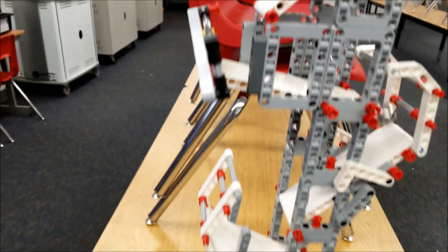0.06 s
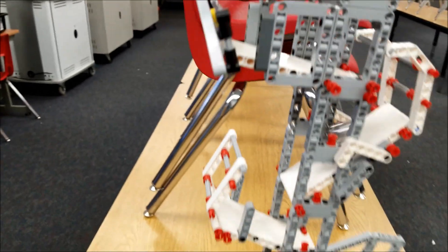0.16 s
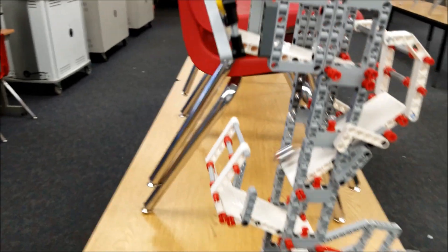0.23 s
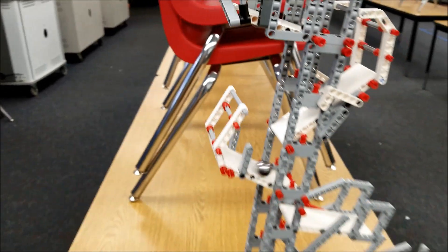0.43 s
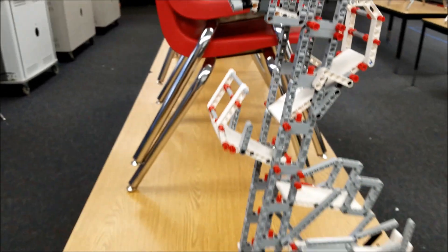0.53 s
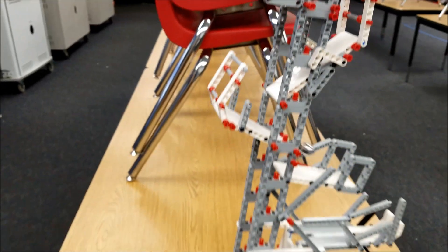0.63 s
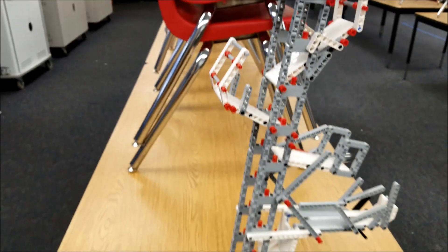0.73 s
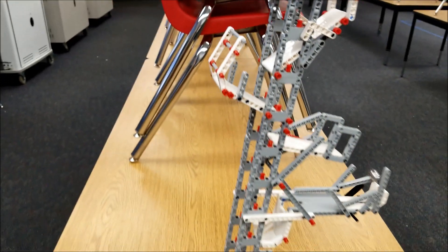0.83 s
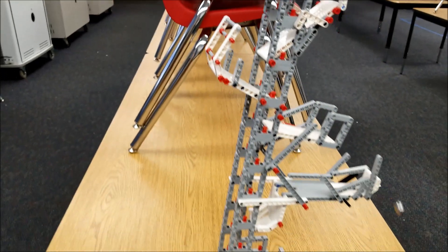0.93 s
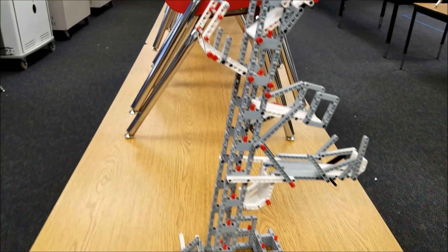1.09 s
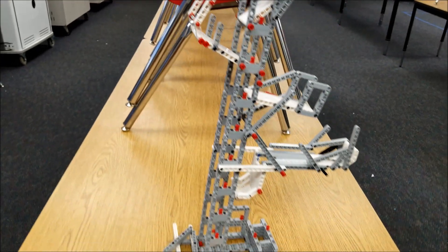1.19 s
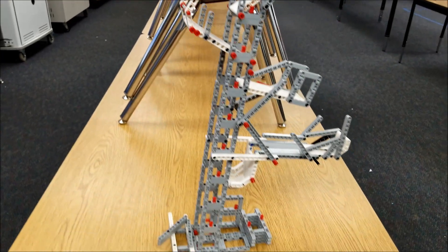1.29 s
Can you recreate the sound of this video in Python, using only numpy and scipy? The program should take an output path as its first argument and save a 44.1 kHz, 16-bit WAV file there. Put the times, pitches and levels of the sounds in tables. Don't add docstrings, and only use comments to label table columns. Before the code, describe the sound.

Steel ball dropping from slide to slide on a plastic toy tower, hard bright clacks, quiet classroom.

```python
import sys
import numpy as np
from scipy import signal
from scipy.fft import rfft, irfft
from scipy.io import wavfile
from scipy.ndimage import uniform_filter1d

SR = 44100
rng = np.random.default_rng(int(sys.argv[2]) if len(sys.argv) > 2 else 0)


def voltage_ratio(level):
    return 10 ** (np.asarray(level, float) / 20)


def file_out(sig):
    cols = np.atleast_2d(sig).T
    lim = np.clip(cols, -1, 1)
    pcm = np.round(lim * 32767).astype(np.int16)
    wavfile.write(sys.argv[1], SR, pcm)


N = 59535

# f/Hz, share/0-1
ROOM_SHARE = [(150, 0.91), (400, 0.53), (1400, 0.45), (4000, 0.01)]


def read(table, hz):
    table = np.array(table, float)
    return np.interp(np.log(np.maximum(hz, 1)), np.log(table[:, 0]), table[:, 1])


def curve(table):
    table = np.array(table, float)
    return voltage_ratio(np.interp(np.arange(N) / SR, table[:, 0], table[:, 1]))


def causal(db):
    cepstrum = irfft(db * np.log(10) / 20)
    half = len(cepstrum) // 2
    fold = np.r_[1, np.full(half - 1, 2), 1, np.zeros(half - 1)]
    return np.exp(rfft(cepstrum * fold))


def pair(white, likeness):
    both, apart = rfft(white)
    share = np.clip(read(likeness, np.linspace(0, SR / 2, len(both))), 0, 1)
    opposed = apart * np.array([[1], [-1]])
    return (np.sqrt(1 + share) * both + np.sqrt(1 - share) * opposed) / np.sqrt(2)


def noise(db, grain_db=0.):
    white = rng.standard_normal((2, N)) * voltage_ratio(grain_db * rng.exponential(size=N))
    out = irfft(pair(white, ROOM_SHARE) * voltage_ratio(db), N)
    return out / out.std()


def strike(hits, colour, rings, right_late_us, chatter_db, room_db):
    # f/Hz, share
    alike = [(400, 4), (1500, 1.5), (6000, -0.5)]
    size = 4096
    hz, t = np.linspace(0, SR / 2, size // 2 + 1), np.arange(size) / SR
    ring = sum(lift / (1 + (2 * (hz - f) / width) ** 2) for f, width, lift in rings)
    late = np.array([[0], [right_late_us / 10 ** 6]])
    near, feed = np.zeros((2, N + size)), np.zeros(N + size)
    for at, db, tilt, ms, pan in hits:
        i = int(at * SR) - 16
        start = np.exp(-2j * np.pi * hz * (at - i / SR + late))
        tick = -min(1, 0.71 / ms)
        grit = rng.standard_normal((2, size)) * np.exp(-t / (ms / 1000))
        chatter = voltage_ratio(chatter_db) * pair(grit, alike) * hz / np.hypot(hz, 1590)
        push = (tick + chatter) * start
        body = read(colour, hz) + tilt * np.log2(np.maximum(hz, 800) / 3000)
        hit = irfft(push * causal(body + ring))
        shade_db = np.clip(pan, -5, 5) * np.array([[1], [-1]]) * hz / (hz + 2420)
        hit = irfft(rfft(hit) * voltage_ratio(shade_db))
        gain = voltage_ratio(db) / np.abs(hit.mean(axis=0)).max()
        near[:, i:i + size] += hit * gain
        feed[i:i + size] += irfft(push[0] * causal(body + 0.29 * ring)) * gain * voltage_ratio(room_db)
    return near[:, :N], feed[:N]


def ventilation():
    # f/Hz, level/dB
    air = [(25, -28), (42, -29), (62, -9), (98, -23.5), (125, -15.5), (165, -21), (280, -32), (520, -47.5),
           (6000, -59), (13000, -48)]
    return noise(read(air, np.linspace(0, SR / 2, N // 2 + 1))) * voltage_ratio(-65)


def mains_hum():
    wobble = uniform_filter1d(rng.standard_normal(N), size=2000)
    level_db = -66.5 + 0.5 * wobble / wobble.std()
    return np.sqrt(2) * np.sin(2 * np.pi * 119.6 * np.arange(N) / SR) * voltage_ratio(level_db)


def trembling_tower():
    # t/s, level/dB
    shaking = [(0, -50), (.06, -71.5), (.15, -55), (.2, -70.5), (.25, -60), (.29, -68), (.33, -55.5),
               (.52, -61.5), (.58, -91), (.68, -86), (.75, -64), (.95, -74)]
    centre_hz, width_hz = 82, 80
    hz = np.linspace(0, SR / 2, N // 2 + 1)
    return noise(-20 * np.log10(1 + (2 * (hz - centre_hz) / width_hz) ** 2)) * curve(shaking)


def rolling_ball():
    # t/s, level/dB
    rolling = [(0, -53), (.03, -60.5), (.09, -72.5), (.3, -64), (.4, -58), (.52, -70), (.6, -67.5),
               (.66, -77), (.8, -75.5), (.9, -56.5), (1.02, -105)]
    # f/Hz, level/dB
    colour = [(150, -34.5), (250, -7.5), (1640, -13.5), (1980, -12), (3520, -18), (4340, -18.5),
              (7570, -22), (16000, -24.5)]
    return noise(read(colour, np.linspace(0, SR / 2, N // 2 + 1)), grain_db=1.5) * curve(rolling)


def table_top():
    # t/s, peak/dB, tilt/(dB per octave), chatter/ms, left-right/dB
    hits = [
        (.0458, -51, 2, .3, 0),
        (1.2563, -34, 0.28, 0.34, 0),
        (1.263, -53.5, 3.5, .3, 0),
        (1.3265, -50, 0, 0.22, 1),
    ]
    # f/Hz, level/dB
    colour = [(120, -21), (200, -8), (623, -3), (1040, -9), (1710, -17), (2860, -22.5), (6760, -46),
              (10100, -40), (16000, -37)]
    # f/Hz, width/Hz, lift/dB
    rings = [(333, 60, 5.5), (1030, 140, 7.6), (1440, 270, 3.4)]
    return strike(hits, colour, rings, right_late_us=170, chatter_db=-19, room_db=-0.38)


def top_slide():
    # t/s, peak/dB, tilt/(dB per octave), chatter/ms, left-right/dB
    hits = [
        (.1015, -16, -0.5, 0.37, 1),
        (.1023, -22, 4, 1.8, 0),
        (.1063, -27, 2, 2, -3),
        (.1095, -30.5, -1, 0.69, 2.5),
        (.1104, -29.5, 3.5, 2, -2),
        (.116, -35, -4.5, 1.6, 5.5),
    ]
    # f/Hz, level/dB
    colour = [(60, -35.5), (140, -1), (330, -16), (1100, -9), (2800, -13.5), (9500, -18), (13500, -17.5),
              (16500, -21.5)]
    # f/Hz, width/Hz, lift/dB
    rings = [(500, 87, 11), (657, 190, 12.5), (1900, 400, 4), (5800, 710, 11), (7770, 620, 6),
             (12800, 900, 13), (14100, 500, 4.5)]
    return strike(hits, colour, rings, right_late_us=41, chatter_db=-6.5, room_db=-6.5)


def gate():
    # t/s, peak/dB, tilt/(dB per octave), chatter/ms, left-right/dB
    hits = [
        (.2456, -34.5, -0.24, 1, 0),
        (.2463, -35, 0.21, 1.5, 0.016),
        (.2487, -34.5, -2.3, 1.5, 0.13),
        (.2517, -33, 1.7, 1, 0.97),
        (.2535, -41.5, 0, 2, 0),
    ]
    # f/Hz, level/dB
    colour = [(120, -31), (330, -1.5), (1200, -9.5), (4200, -13), (6500, -12.5), (9500, -17), (15500, -19)]
    # f/Hz, width/Hz, lift/dB
    rings = [(650, 250, 3.5), (1990, 250, 5.3), (3350, 300, 6.9), (5730, 900, 6), (11700, 900, 5),
             (13700, 840, 7.6)]
    return strike(hits, colour, rings, right_late_us=82, chatter_db=-4, room_db=-9)


def chute():
    # t/s, peak/dB, tilt/(dB per octave), chatter/ms, left-right/dB
    hits = [
        (.3088, -12, 1, 0.65, 1.5),
        (.3108, -24.5, 1.5, 1.5, 1.5),
        (.3128, -30.5, -3, 1.5, -1),
        (.315, -21.5, -1, 1.5, -3.5),
        (.3173, -26, -3, 1, -4),
        (.3232, -24, 4, 1.5, 7.5),
        (.3248, -25, 1, 2, 5),
        (.3275, -32.5, -0.5, 3, -0.5),
    ]
    # f/Hz, level/dB
    colour = [(90, -43.5), (200, -6), (1100, -10), (2200, -11), (4300, -17.5), (9000, -14.5),
              (16000, -13.5)]
    # f/Hz, width/Hz, lift/dB
    rings = [(688, 170, 7.6), (1483, 440, 10), (2920, 560, 15), (5840, 770, 14.5), (7800, 350, 13),
             (11120, 800, 13), (13310, 1500, 6)]
    return strike(hits, colour, rings, right_late_us=-40, chatter_db=-9, room_db=-9.5)


def rail():
    # t/s, peak/dB, tilt/(dB per octave), chatter/ms, left-right/dB
    hits = [
        (.3355, -40, -2, 1.6, -0.5),
        (.345, -34, 0.5, 6, -0.5),
        (.3603, -30, 2, 1.6, -0.5),
        (.376, -42, -4.5, 2, -8),
        (.3803, -36, -1, 6.1, 2),
        (.395, -38.5, 3, 3, -1.5),
        (.4003, -44, 0.5, 2.3, -6.5),
    ]
    # f/Hz, level/dB
    colour = [(90, -34.5), (250, -15.5), (1500, -5.5), (4200, -10.5), (9000, -14), (12000, -9),
              (16000, -19.5)]
    # f/Hz, width/Hz, lift/dB
    rings = [(1810, 500, 7.9), (2760, 540, 4.3), (6100, 890, 7), (7700, 890, 9.2)]
    return strike(hits, colour, rings, right_late_us=-21, chatter_db=-2, room_db=-5)


def flap():
    # t/s, peak/dB, tilt/(dB per octave), chatter/ms, left-right/dB
    hits = [
        (.4751, -28, 1, 1.72, 0),
        (.4802, -33, -0.5, 0.91, 1),
        (.4815, -27, 4, 0.3, 2),
        (.4827, -37, -5, 1.2, 1),
        (.495, -47.5, -4.5, 0.62, 0),
        (.527, -50, -2.5, 1.3, 0),
    ]
    # f/Hz, level/dB
    colour = [(120, -20), (230, -7.5), (600, -12.5), (1500, -11), (4000, -16.5), (6500, -13), (9500, -17),
              (15500, -19)]
    # f/Hz, width/Hz, lift/dB
    rings = [(880, 350, 3.1), (6380, 400, 6.4), (7940, 700, 11), (10350, 640, 6.2), (12500, 600, 14)]
    return strike(hits, colour, rings, right_late_us=55, chatter_db=-6, room_db=-7.5)


def ramp():
    # t/s, peak/dB, tilt/(dB per octave), chatter/ms, left-right/dB
    hits = [
        (.6765, -60.5, -5, 1, 4),
        (.6992, -18.5, 0, 1, -4.5),
        (.701, -25.5, -2, 1.3, 2),
        (.703, -28, -1.5, 1.8, 3.5),
        (.7055, -24.5, -1.5, 0.98, 4),
        (.708, -36, -4, 2.9, 2.5),
        (.7135, -28, 0.5, 0.75, 2),
        (.7165, -37, -6.5, 4.6, -3),
        (.7205, -39, -2, 1.7, -0.5),
        (.7503, -35.5, -1.5, 2.9, -5),
    ]
    # f/Hz, level/dB
    colour = [(59, -38.5), (100, -6), (492, -6), (752, -12.5), (1450, -7.5), (2370, -8.5), (3500, -16),
              (8280, -13), (16000, -15.5)]
    # f/Hz, width/Hz, lift/dB
    rings = [(191, 47, 21.2), (449, 93, 15.5), (1026, 150, 8), (1490, 130, 6), (1785, 250, 10.8),
             (2450, 300, 8), (5900, 660, 6), (12530, 5000, 11)]
    return strike(hits, colour, rings, right_late_us=19.7, chatter_db=-10.5, room_db=-3.5)


def lip():
    # t/s, peak/dB, tilt/(dB per octave), chatter/ms, left-right/dB
    hits = [
        (.8568, -25.5, -0.56, 1, 0.075),
        (.858, -24, -0.51, 1.6, 0.0052),
    ]
    # f/Hz, level/dB
    colour = [(200, -50), (900, -23), (1600, -18.5), (4200, -15.5), (7200, -14.5), (9400, -24.5),
              (13000, -5), (16000, -15.5)]
    # f/Hz, width/Hz, lift/dB
    rings = [(2500, 140, 5), (5800, 800, 5), (8200, 960, 18), (10600, 650, 6), (13300, 700, 8)]
    return strike(hits, colour, rings, right_late_us=64, chatter_db=-4, room_db=-4)


def tray():
    # t/s, peak/dB, tilt/(dB per octave), chatter/ms, left-right/dB
    hits = [
        (.8678, -16, 0.5, 0.84, 0),
        (.869, -16.5, 1, 1.2, -0.56),
        (.8712, -23, -2.5, 2.1, -0.816),
        (.875, -27, -4, 1.4, -1.2),
        (.883, -34.5, 1, 1.8, 0),
        (.8865, -34, 6, 1.7, 0),
        (.895, -30.5, -0.5, 2.2, 0),
        (.9015, -35, -4.5, 3, -1),
    ]
    # f/Hz, level/dB
    colour = [(200, -39), (900, -22.5), (2300, -15), (4200, -15), (7200, -11), (9400, -20), (11700, -8),
              (16000, -9.5)]
    # f/Hz, width/Hz, lift/dB
    rings = [(2400, 450, 7.8), (5400, 2200, 3.5), (7280, 1100, 14.1), (11300, 1500, 7.9), (13100, 480, 3),
             (14600, 900, 11)]
    return strike(hits, colour, rings, right_late_us=69, chatter_db=-6.5, room_db=-6.5)


def room(feed):
    # f/Hz, time/s
    decay = [(150, 1), (500, 0.61), (1400, 0.38), (3700, 0.36), (9000, 0.29), (15000, 0.2)]
    size, gap_s, rise_s = 32768, 0.0027, 0.011
    t, hz = np.arange(size) / SR, np.linspace(0, SR / 2, size // 2 + 1)
    white = pair(rng.standard_normal((2, size)), ROOM_SHARE)
    early = voltage_ratio(9.5 - 60 * t / 0.059)
    tail = 0
    for mid in 60 * np.sqrt(2) ** np.arange(17):
        band = np.clip(1 - 2 * np.abs(np.log2(np.maximum(hz, 1) / mid)), 0, 1)
        fall = voltage_ratio(-60 * t / read(decay, mid))
        tail = tail + irfft(white * band) * (fall + early)
    tail = tail * np.clip((t - gap_s) / rise_s, 0, 1) / 30
    return signal.fftconvolve(feed[None], tail, axes=1)[:, :N]


def scene():
    parts = [top_slide(), gate(), chute(), ramp(), tray(), table_top(), flap(), rail(), lip()]
    direct = sum(near for near, feed in parts)
    answer = room(sum(feed for near, feed in parts))
    background = mains_hum() + trembling_tower() + rolling_ball() + ventilation()
    return direct + answer + background


def band_limit(x):
    return signal.sosfilt(signal.butter(12, 16970, fs=SR, output="sos"), x)


def record(dry):
    # f/Hz, lift/dB
    left_lift = [(100, 1.2), (1500, 0.72), (5000, 0.83), (12000, 6.2)]
    lift = read(left_lift, np.linspace(0, SR / 2, N // 2 + 1)) * np.array([[.5], [-.5]])
    ports = irfft(rfft(dry) * voltage_ratio(lift), N)
    top_cut = signal.ellip(8, 1, 60, 15760, fs=SR, output="sos")
    return band_limit(signal.sosfilt(top_cut, ports))


dry = scene()
out = record(dry)
file_out(out)
```